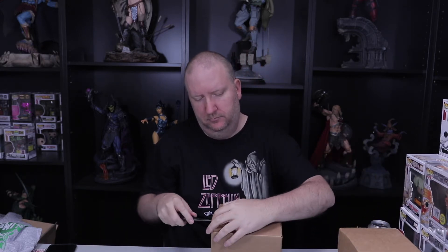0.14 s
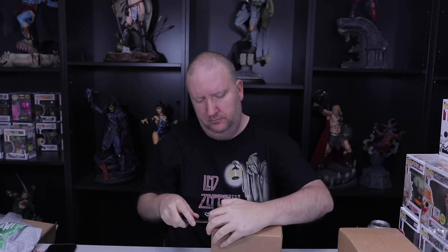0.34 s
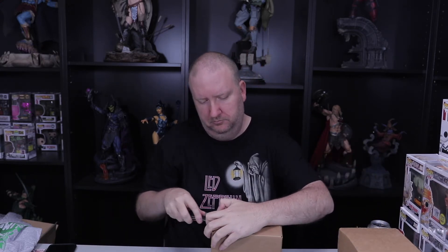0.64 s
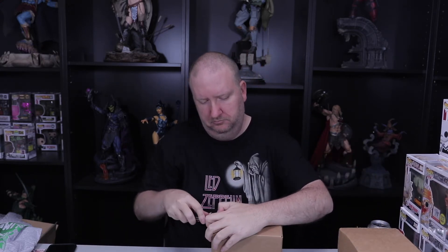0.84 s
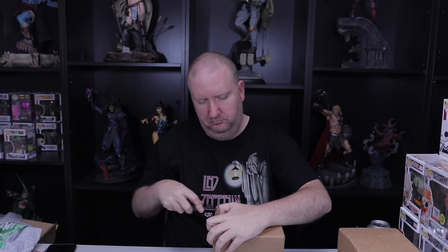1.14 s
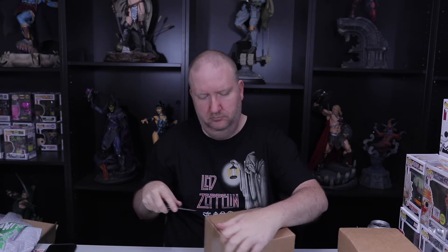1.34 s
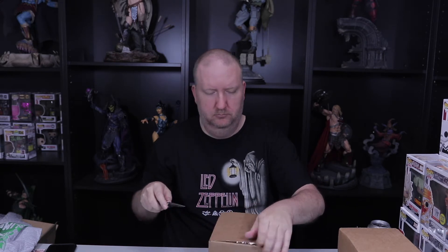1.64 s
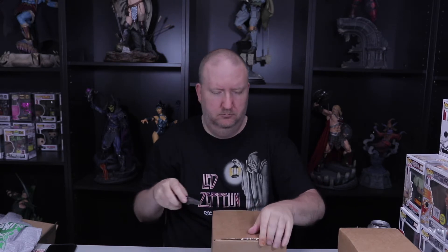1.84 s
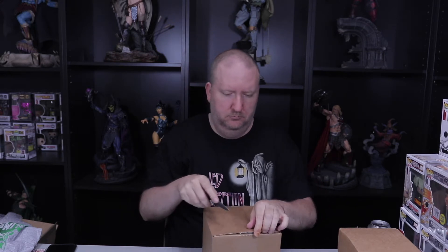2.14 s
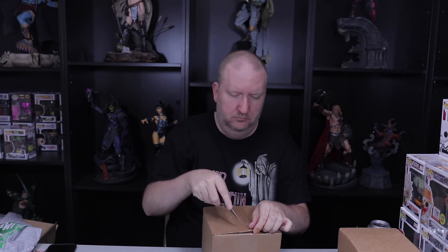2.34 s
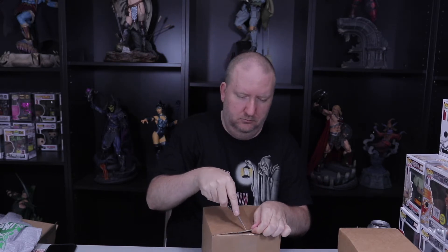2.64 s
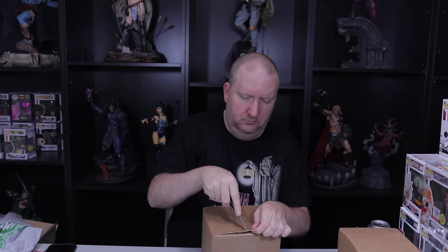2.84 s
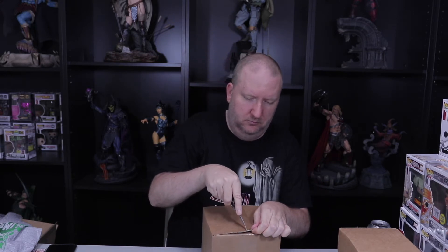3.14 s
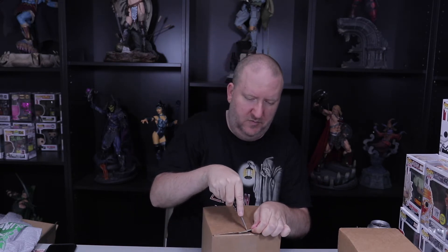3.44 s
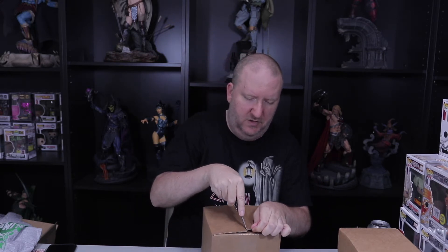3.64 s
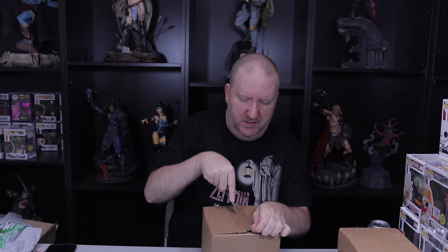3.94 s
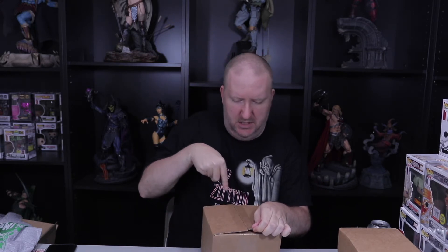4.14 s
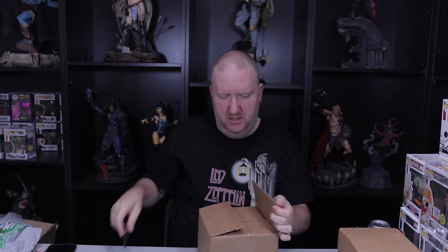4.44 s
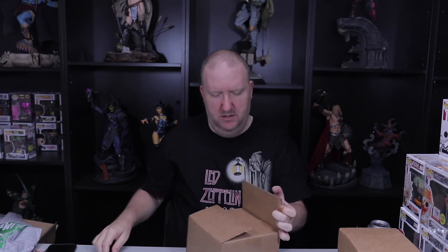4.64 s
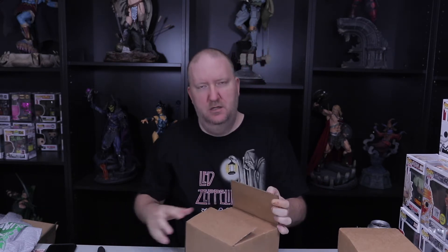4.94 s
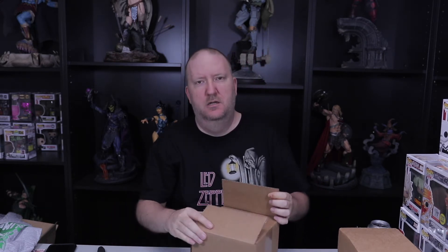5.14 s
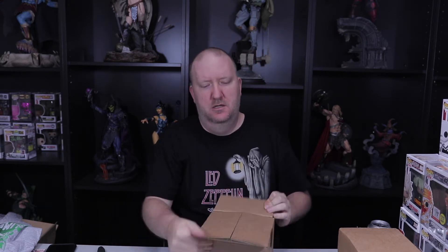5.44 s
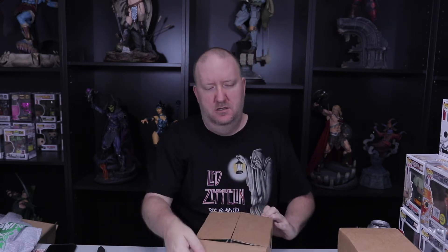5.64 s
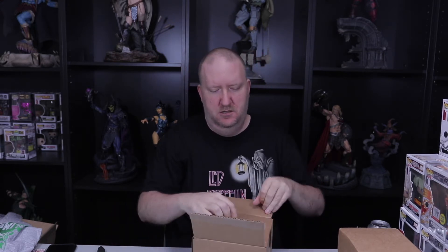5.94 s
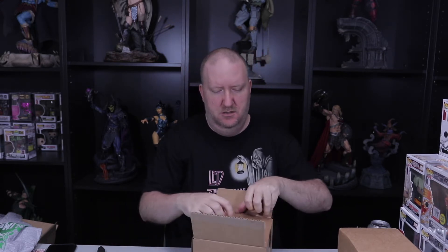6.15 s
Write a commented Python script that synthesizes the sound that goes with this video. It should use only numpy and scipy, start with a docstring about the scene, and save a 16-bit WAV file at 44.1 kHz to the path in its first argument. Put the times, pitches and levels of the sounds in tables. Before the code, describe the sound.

A close microphone in a small, fairly live room, over very faint low rumble and hiss. From 0.2 s hands slide a cardboard box softly on a desk; a light tick at 0.5, dull palm thuds around 0.8, then a firm hollow bump and brief scuff at 1.0. Brighter sliding at 1.3, softer turning at 1.8, a small knife tick at 2.2, and faint bumps to 2.7. Near quiet until tape pops crisply with a crunch at 3.5. From 3.65 to 4.17 a blade rasps along the seam, growing louder, with rapid sharp snaps from 3.83 and a thin film rip near the end; a final pop at 4.25. Flaps scrape; the knife knocks loudly on the desk at 4.62, bouncing and chattering until 4.95. Flaps rub from 5.0, with dry crease cracks at 5.3, 5.45 and strongly at 5.6. Soft thuds and scrapes close at 6.0-6.3.

```python
"""Hands grip a taped cardboard box and turn it on a desk; a small blade pops the tape and rips along the seam,
snapping from rib to rib of the board; flaps rub and crack at their creases as the knife, put down, rocks to rest.
Friction is random fibre catches over hiss, moved in strokes; blows are a sharp push and a short crumple.
Both are filtered by the resonances of box, flap, knife or desk.
One close microphone in a small, fairly live room, over faint room tone; the same signal on both channels."""
import sys
import numpy as np
from scipy import signal
from scipy.fft import rfft, irfft
from scipy.io import wavfile
from scipy.ndimage import uniform_filter1d

SR = 44100
rng = np.random.default_rng(int(sys.argv[2]) if len(sys.argv) > 2 else 0)


def wav_out(sig):
    """Save sig, one row per channel (or a flat mono array), as 16-bit PCM at SR to the path in sys.argv[1]."""
    wavfile.write(sys.argv[1], SR, np.round(np.clip(np.atleast_2d(sig).T, -1, 1) * 32767).astype(np.int16))


N = 277389
TIME = np.arange(N) / SR  # s
BASS_EDGE_HZ, TREBLE_EDGE_HZ, TOP_HZ = 600, 4500, 15900

# Event levels set the middle register, before the mix gain in scene().
# Sharpness is the treble against that middle, weight is the bass against it.

# Faint house rumble and microphone hiss, relative: (frequency [Hz], density [dB per Hz])
ROOM_TONE_COLOUR = [(15, -4), (25, -26), (64, -8.5), (102, -6), (114, -11), (229, -7.5), (285, -18.5),
                    (363, -14), (607, -19.5), (714, -20.5), (1940, -26), (13600, -32), (16000, -30.5)]
# Time for the room's echoes to die by 60 dB: (frequency [Hz], time [s])
ROOM_T60 = [(100, 0.61), (260, 0.42), (700, 0.29), (1900, 0.41), (4800, 0.37), (13000, 0.25)]

# The box slides under the hands:
# (start [s], rise [s], fall [s], level [dB], sharpness [dB], weight [dB])
SLIDES = [(.17, 0.29, 0.18, -57, 0.5, -4.5), (.58, 0.15, 0.12, -48.5, -0.5, -7.5),
          (.87, 0.052, 0.2, -48.5, -0.5, -1.5), (.985, 0.041, 0.041, -31, -2, -3),
          (1.05, 0.11, 0.44, -48.5, 1, 1), (1.27, 0.2, 0.27, -38, 5, -6.5),
          (1.735, 0.053, 0.16, -47, 1, -6.5), (1.89, 0.063, 0.48, -46, -1, -6),
          (2.25, 0.068, 0.36, -60.5, -3, -5), (2.48, 0.087, 0.11, -52.5, -5.5, 6)]
# Fingers meet the box, the box bumps the desk: (time [s], level [dB], sharpness [dB], weight [dB])
GRIPS = [(0.466, -40, -10, -5.5), (0.9813, -21.5, 0, -11.5), (0.9838, -23, -16, -26),
         (1.0302, -27, -5, -2.5), (1.272, -42, -1, 4), (1.3115, -34, 4, -15), (2.264, -44.5, -5, 4),
         (2.3475, -58, 10, -15), (2.3805, -46.5, 1, -9), (2.411, -49, 4.5, -0.5), (2.472, -44.5, -7, -1),
         (2.512, -48.5, 1, 12.5), (2.545, -40, -3.5, 1.5), (2.5805, -37, -10, 0), (2.586, -38, -13, -4),
         (2.72, -47.5, -14, 1.5), (2.992, -56.5, -2, 6), (6.0045, -36, -4.5, 4.5),
         (6.148, -35.5, -11, -5.5), (6.261, -47, -9, 7)]
# Light ticks of the knife: (time [s], level [dB], sharpness [dB], weight [dB])
KNIFE_TICKS = [(.4805, -48, 4, -23), (2.1797, -32.5, 3, -18), (3.409, -53, -18, -10), (3.468, -55, 3, -12),
               (4.7295, -24, -14, -4.5)]
# Soft thuds of the palm on the hollow box: (time [s], peak level [dB], contact [s])
THUDS = [(0.804, -38, 0.0061), (0.827, -37, 0.011), (0.862, -34, 0.0095), (1.041, -28, 0.0021),
         (1.768, -34, 0.004), (2.722, -40, 0.0068), (4.159, -24, 0.0022), (6.008, -24, 0.0021)]
# The taut tape pops as the point goes in, and again as its last strand parts:
# (time [s], level [dB], sharpness [dB])
TAPE_POPS = [(3.5039, -29, 0.5), (3.5048, -22, 5), (3.512, -29.5, 5.5), (4.2526, -21, -6.5)]
# The blade jumps to the next rib of the board, about every 20 ms at full speed: (time [s], level [dB])
RIB_SNAPS = [(3.827, -16.5), (3.8742, -18.5), (3.8955, -24.5), (3.9158, -16), (3.937, -21.5), (3.9595, -28),
             (3.9818, -25.5), (4.0024, -15.5), (4.0226, -13.5), (4.0412, -18.5), (4.059, -23),
             (4.0752, -20.5), (4.1095, -18.5), (4.1452, -16), (4.1543, -17), (4.1635, -25)]
# The blade crunches in through the tape and out over the far edge:
# (start [s], rise [s], fall [s], level [dB], sharpness [dB], weight [dB])
CRUNCHES = [(3.504, 0.011, 0.077, -32.5, -19, -1.5), (4.143, 0.0082, 0.036, -27, -8, -1.5)]
# The last stretch of film rips: (start [s], rise [s], fall [s], level [dB], sharpness [dB], weight [dB])
FILM_RIPS = [(4.022, 0.0091, 0.07, -26.5, -6, -27)]
# A flap scrapes past its neighbour or the fingers:
# (start [s], rise [s], fall [s], level [dB], sharpness [dB], weight [dB])
SCRAPES = [(4.25, 0.011, 0.065, -39, -22, -10), (4.375, 0.012, 0.097, -47, -4.5, -10),
           (4.5, 0.054, 0.22, -47, -2.5, -4), (4.61, 0.024, 0.39, -41.5, -13, -18),
           (4.97, 0.054, 0.12, -43.5, -1.5, -4), (5.11, .06, 0.064, -32.5, -6.5, -7.5),
           (5.24, 0.027, 0.085, -47, -0.5, -9), (5.33, 0.019, 0.17, -41, -5.5, -6.5),
           (5.42, 0.03, 0.19, -40.5, 3.5, -6), (5.615, 0.02, 0.078, -37.5, -17, -10),
           (5.7, 0.017, 0.12, -49.5, 1.5, 1), (5.94, 0.043, 0.073, -60, 1.5, 0),
           (6.003, 0.014, 0.073, -42, -5.5, -12), (6.147, 0.0093, 0.074, -43.5, -2, -4),
           (6.255, 0.013, 0.16, -44, -3, 3.5)]
# The board buckles along a fold: (time [s], level [dB], sharpness [dB])
CREASE_CRACKS = [(4.379, -45.5, 6), (4.503, -39, -3.5), (4.588, -28.5, -12), (5.013, -37, -9),
                 (5.279, -40, -2), (5.3065, -35, -6), (5.3226, -30.5, -10), (5.3304, -23.5, -6),
                 (5.4249, -23, -14), (5.4425, -22.5, -12), (5.4562, -19, -26), (5.4582, -17, -26),
                 (5.611, -16, -2.5)]
# The knife lands, bounces and rocks to rest: (time [s], level [dB])
KNIFE_KNOCKS = [(4.6202, -11), (4.6268, -17), (4.6425, -20), (4.656, -47), (4.671, -56), (4.687, -42),
                (4.698, -34), (4.739, -25.5), (4.752, -57), (4.772, -30), (4.781, -29.5), (4.8392, -26),
                (4.8465, -28.5), (4.862, -27.5), (4.882, -33), (4.899, -38), (4.911, -31.5), (4.932, -36.5)]

# Resonances of box, air and large panels, knife, flap and desk top:
# (frequency [Hz], width [Hz], level against the broad response [dB])
BOX_MODES = [(113, 24, -10), (157.5, 40, 17), (235, 66, 8), (336.6, 46, 11), (428, 26, 11), (506, 51, -0.5),
             (790, 74, -2.5), (939, 18, 8), (1710, 250, -3), (3230, 610, -4.5), (3620, 790, -6)]
CAVITY_MODES = [(110, 19, 6), (186, 31, 19), (215, 30, 16), (313, 35, 20)]
KNIFE_MODES = [(3040, 600, 15), (4540, 400, 10), (5400, 570, 14.5), (6900, 540, 13.5), (9400, 1200, 8)]
FLAP_MODES = [(124, 120, 14), (208, 17, 3.9), (335, 24, 14.4), (755, 27, 15), (858, 79, 12), (1016, 60, 10),
              (1260, 160, 6.8), (1805, 39, 1.7), (1943, 100, 5.9), (2740, 720, 3.4), (3480, 190, 6.4)]
DESK_MODES = [(105, 12, 4.7), (160, 30, 17.2), (300, 45, 15.8), (349.7, 19, 20), (423, 35, 12.3),
              (510, 40, 2.6), (606, 26, 11.6), (940, 21, 4.7), (1115, 17, 9.3), (1260, 18, 7.4),
              (1660, 130, 10.5), (1840, 100, 17.4), (1980, 78, 12.4), (3300, 780, 6.5)]

# Broad responses under those resonances: (frequency [Hz], level [dB])
SLIDE_COLOUR = [(40, 3.5), (90, 3.5), (160, -4), (300, -1), (700, 0.5), (1500, 3), (3400, 4), (5500, -4.5),
                (7000, -6), (9800, -2.5), (13000, -9.5), (16000, -13.5)]
BOX_BLOW_COLOUR = [(40, -25.5), (110, -4), (400, -5), (1000, 2.5), (2200, 0.5), (4000, -3), (6000, -4),
                   (10000, -0.5), (16000, -4)]
KNIFE_COLOUR = [(40, -34), (600, 9), (2000, -3), (4000, 1.5), (8000, -6), (13000, 3), (16000, -4)]
CAVITY_COLOUR = [(40, -16), (100, -2), (250, -4.5), (500, -9), (2000, -13), (16000, -60)]
CUT_COLOUR = [(40, -28), (100, -7), (300, -8), (700, 0), (2000, 3), (4000, -0.5), (6000, -10), (9000, -9),
              (12000, -13), (16000, -22)]
FILM_COLOUR = [(40, -34), (600, -32), (2000, -19), (3000, 6), (4700, 0), (5800, -5), (9000, -14),
               (16000, -22)]
FLAP_COLOUR = [(40, -19), (110, -8), (400, -1.5), (1000, 1), (1600, 4), (3600, -3), (5000, -11),
               (7000, -13.5), (10000, -12.5), (13000, -16.5), (16000, -23.5)]
CREASE_COLOUR = [(40, -48), (120, -2.5), (500, 3), (1000, -5), (3700, 3), (5000, 0.5), (8000, 9.5),
                 (12000, 9), (16000, 9.5)]
DESK_COLOUR = [(40, -20), (100, 6.5), (400, 4), (800, 1), (2000, -6), (3700, -7), (5000, -15),
               (8000, -21.5), (16000, -40)]

# One pull along the seam: the blade bites, is pressed ever harder, and runs out
PULL_START_S, PULL_LENGTH_S, PULL_ATTACK_S, PULL_RELEASE_S = 3.655, 0.512, 0.029, 0.069
PULL_DB, PULL_RISE_DB_PER_S, PULL_SHARP_DB, PULL_WEIGHT_DB = -35, 6, -3.5, -2


def undb(db):
    """Decibels to gain."""
    return 10 ** (np.asarray(db) / 20)


def rms(x):
    """Root mean square, kept above zero."""
    return np.sqrt(np.mean(x ** 2)) + 1e-12


def along(hz, points):
    """Read (Hz, value) points on a log-frequency axis."""
    f, value = np.transpose(points)
    return np.interp(np.log(hz + 1), np.log(f), value)


def butter(hz, kind, order=3):
    """Butterworth filter sections."""
    return signal.butter(order, hz, kind, fs=SR, output="sos")


def response(colour, modes=(), size=8192):
    """Minimum-phase impulse response of a broad colour with resonances standing on it."""
    hz = np.arange(size + 1) * SR / (2 * size)
    power = np.ones(size + 1)
    for f, width, db in modes:
        power += undb(db) ** 2 / (1 + (2 * (hz - f) / width) ** 2)
    magnitude = undb(along(hz, colour)) * np.sqrt(power)
    # Folding the cepstrum onto positive time makes the response causal
    cepstrum = irfft(np.log(magnitude))
    cepstrum[1:size] *= 2
    cepstrum[size + 1:] = 0
    return irfft(np.exp(rfft(cepstrum)))[:size]


def registers(force, body):
    """A force sounds a body: the bass of its cavity, the middle of its panels, the treble of the contact."""
    sound = signal.fftconvolve(force, body)[:len(force)]
    bass = signal.sosfilt(butter(BASS_EDGE_HZ, "low"), sound)
    middle = signal.sosfilt(butter([BASS_EDGE_HZ, TREBLE_EDGE_HZ], "band"), sound)
    treble = signal.sosfilt(butter(TREBLE_EDGE_HZ, "high"), sound)
    return bass, middle, treble


def walk(rate):
    """Random drift in straight lines between rate new values a second."""
    return np.interp(TIME * rate, np.arange(N), rng.standard_normal(N))


def rub(body, catch_rate, catch_spread_db, hiss_db, judder_rate, judder_db):
    """Friction: fibres catch and let go at random over a fine hiss while the hand's pressure judders."""
    caught = rng.random(N) < catch_rate / SR  # catch_rate is per second
    strength_db = catch_spread_db * np.minimum(rng.exponential(size=N), 4)
    catches = caught * rng.choice([-1, 1], N) * undb(strength_db)
    hiss = undb(hiss_db) * rng.standard_normal(N)
    pressure = undb(judder_db * walk(judder_rate))
    force = (catches / rms(catches) + hiss) * pressure
    return np.array([x / rms(x) for x in registers(force, body)])


def strokes(table, friction, loudness_power, treble_power):
    """The hand speeds up and slows to a stop; the faster it moves, the louder and brighter the friction."""
    out = np.zeros(N)
    for s, rise_s, fall_s, db, sharp_db, weight_db in table:
        moving = (TIME > s) & (TIME < s + rise_s + fall_s)
        ramp = np.interp(TIME[moving] - s, [0, rise_s, rise_s + fall_s], [0, 1, 0])
        speed = np.sin(np.pi / 2 * ramp)
        bass, middle, treble = friction[:, moving]
        sound = undb(weight_db) * bass + middle
        sound += undb(sharp_db) * speed ** treble_power * treble
        out[moving] += undb(db) * speed ** loudness_power * sound
    return out


def blows(table, body, crumple_s, crumple_db, crumple_hz, size=8192):
    """Each blow is one sharp push and a few milliseconds of duller crumpling after it."""
    out, t = np.zeros(N + size), np.arange(size) / SR
    attack, swing = t < .003, t < .012  # level windows: bass takes longer to swing
    soften = butter(min(crumple_hz, TOP_HZ), "low", order=1)
    for s, db, sharp_db, weight_db in table:
        crumple = signal.sosfilt(soften, rng.standard_normal(size))
        force = undb(crumple_db) * crumple * np.exp(-t / crumple_s)
        force[0] += 1  # the sharp push
        bass, middle, treble = registers(force, body)
        sound = undb(weight_db) * bass / rms(bass[swing])
        sound += middle / rms(middle[attack])
        sound += undb(sharp_db) * treble / rms(treble[attack])
        start = int(np.clip(s * SR, 0, N))
        out[start:start + size] += undb(db) * sound
    return out[:N]


def coloured(table, sharp_db, weight_db, sharp_slope, weight_slope, weight_db_per_s=0):
    """Sharpness and weight shift with each dB above the average blow; weight also shifts with time."""
    s, db = np.transpose(table)
    harder, later = db - db.mean(), s - s.mean()
    sharp = sharp_db + sharp_slope * harder
    weight = weight_db + weight_slope * harder + weight_db_per_s * later
    return np.column_stack([s, db, sharp, weight])


def room_tone():
    """Faint rumble of the house and microphone hiss: steady noise in one fixed colour."""
    air = signal.fftconvolve(rng.standard_normal(N), response(ROOM_TONE_COLOUR))[:N]
    return undb(-60) * air / rms(air)


def box_slides():
    """The box slides and turns on the desk: dense fibre catches sound its panels."""
    friction = rub(response(SLIDE_COLOUR, BOX_MODES), catch_rate=4000, catch_spread_db=3.0,
                   hiss_db=0.5, judder_rate=57, judder_db=1.4)
    return strokes(SLIDES, friction, loudness_power=0.94, treble_power=0.46)


def box_grips():
    """Fingers meeting the box and bumps on the desk strike the panels and crumple the board."""
    body = response(BOX_BLOW_COLOUR, BOX_MODES)
    return blows(GRIPS, body, crumple_s=0.0037, crumple_db=-4, crumple_hz=6000)


def knife_ticks():
    """Light contacts excite the short, high ring of the knife."""
    body = response(KNIFE_COLOUR, KNIFE_MODES)
    return blows(KNIFE_TICKS, body, crumple_s=0.0015, crumple_db=0, crumple_hz=9000)


def palm_thuds(size=8192):
    """A soft half-sine push sounds only the air and the large panels of the box."""
    out, t = np.zeros(N + size), np.arange(size) / SR
    cavity = response(CAVITY_COLOUR, CAVITY_MODES)
    for s, db, contact_s in THUDS:
        push = np.sin(np.pi * np.minimum(t / contact_s, 1))
        boom = signal.fftconvolve(push, cavity)[:size]
        start = int(s * SR)
        out[start:start + size] += undb(db) * boom / np.abs(boom).max()
    return out[:N]


def tape_pops_and_rib_snaps():
    """Parting tape and each jump of the blade to the next rib strike the hollow box."""
    pops = [(s, db, sharp_db, -22.5) for s, db, sharp_db in TAPE_POPS]  # weight in dB
    # The freed lid booms more the further the cut has gone
    ribs = coloured(RIB_SNAPS, sharp_db=-9.0, weight_db=-5.5, sharp_slope=0.072,
                    weight_slope=-0.8, weight_db_per_s=18)
    body = response(BOX_BLOW_COLOUR, BOX_MODES)
    return blows(np.vstack([pops, ribs]), body, crumple_s=0.0018, crumple_db=-0.5, crumple_hz=3600)


def blade_rasp():
    """The blade crunches and rasps through tape stretched over the hollow box."""
    rasp = rub(response(CUT_COLOUR, BOX_MODES), catch_rate=1100, catch_spread_db=3.5,
               hiss_db=-3, judder_rate=130, judder_db=2)
    return strokes(CRUNCHES, rasp, loudness_power=1.5, treble_power=.2) + pull(rasp)


def pull(friction):
    """The long cut: attack, a hold that grows with the pressure, release."""
    t = TIME - PULL_START_S
    bite = np.clip(t / PULL_ATTACK_S, 0, 1)
    run_out = np.clip((PULL_LENGTH_S - t) / PULL_RELEASE_S, 0, 1)
    db = PULL_DB + PULL_RISE_DB_PER_S * np.clip(t, 0, PULL_LENGTH_S)
    bass, middle, treble = friction
    sound = undb(PULL_WEIGHT_DB) * bass + middle + undb(PULL_SHARP_DB) * treble
    return bite * run_out * undb(db) * sound


def film_rip():
    """Near the end of the cut the thin film tears, with little bass and no box resonance."""
    film = rub(response(FILM_COLOUR), catch_rate=1500, catch_spread_db=3,
               hiss_db=-6, judder_rate=250, judder_db=2)
    return strokes(FILM_RIPS, film, loudness_power=1.8, treble_power=.1)


def flap_scrapes():
    """The flaps scrape over each other and the fingers, sounding their own panels."""
    friction = rub(response(FLAP_COLOUR, FLAP_MODES), catch_rate=900, catch_spread_db=2.5,
                   hiss_db=-2, judder_rate=90, judder_db=2.5)
    return strokes(SCRAPES, friction, loudness_power=0.83, treble_power=.15)


def crease_cracks():
    """Folds buckle as the flaps bend: sharp pushes with a brief crumple."""
    folds = [(s, db, sharp_db, -18.5) for s, db, sharp_db in CREASE_CRACKS]  # weight in dB
    body = response(CREASE_COLOUR, FLAP_MODES)
    return blows(folds, body, crumple_s=.0022, crumple_db=-7, crumple_hz=3500)


def knife_on_desk():
    """The handle knocks on the desk top and chatters briefly after each knock; soft knocks are mostly bass."""
    knocks = coloured(KNIFE_KNOCKS, sharp_db=-5, weight_db=5.5, sharp_slope=-0.54, weight_slope=-0.37)
    body = response(DESK_COLOUR, DESK_MODES)
    return blows(knocks, body, crumple_s=0.0074, crumple_db=-22.0, crumple_hz=5000)


def diffuse_spectrum(size, order=21):
    """Spectrum of dense random echoes that favour no pitch over their first tenth of a second."""
    noise = rng.standard_normal(size)
    early = noise * np.exp(-np.arange(size) / (.07 * SR))
    early_power = uniform_filter1d(np.abs(rfft(early)) ** 2, order)
    spectrum = rfft(noise) / np.sqrt(early_power)
    return spectrum / rms(irfft(spectrum))


def echoes(bass_db, treble_db, first_wall_s, size=32768, count=10):
    """Diffuse response of shelves and walls; each octave or so dies at its own rate."""
    t, hz = np.arange(size) / SR, np.arange(size // 2 + 1) * SR / size
    spectrum, tail = diffuse_spectrum(size), 0
    centres = np.geomspace(40, 20000, count)  # Hz
    tilt = [(150, bass_db), (BASS_EDGE_HZ, 0), (TREBLE_EDGE_HZ, 0), (TOP_HZ, treble_db)]
    for centre, share in zip(centres, np.eye(count)):
        band = irfft(spectrum * along(hz, np.column_stack([centres, share])))
        onset = np.clip((t - first_wall_s) / first_wall_s, 0, 1)
        fade = onset * np.exp(-np.log(1000) * t / along(centre, ROOM_T60))
        tail = tail + band * fade / np.linalg.norm(fade) * undb(along(centre, tilt))
    return tail


def room(x, wet_db, drift_rate, count=4):
    """Diffuse echo patterns, slowly crossfaded at constant power, so that no single one colours the room."""
    shares = np.array([walk(drift_rate) for _ in range(count)])
    shares /= np.linalg.norm(shares, axis=0)  # constant total power
    wet = np.zeros(N)
    for share in shares:
        tail = echoes(bass_db=0.0, treble_db=-6, first_wall_s=0.0017)
        wet += signal.fftconvolve(x * share, tail)[:N]
    return undb(wet_db) * wet


def scene():
    """Everything reaches one close microphone, the same on both channels."""
    handling = box_slides() + box_grips() + knife_ticks() + palm_thuds()
    cutting = tape_pops_and_rib_snaps() + blade_rasp() + film_rip()
    opening = flap_scrapes() + crease_cracks()
    direct = undb(-2.0) * (handling + cutting + opening + knife_on_desk())
    # The microphone's low cut thins the deep bass of the handling
    direct = signal.sosfilt(butter(99, "high", order=2), direct)
    mono = direct + room(direct, wet_db=-1.5, drift_rate=8) + room_tone()
    return np.array([mono, mono])


def record(dry):
    """The recorder cuts the top with a steep low-pass."""
    return signal.sosfilt(signal.ellip(10, .2, 80, TOP_HZ, fs=SR, output="sos"), dry)


dry = scene()
out = record(dry)
wav_out(out)
```